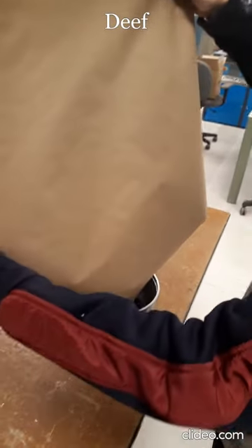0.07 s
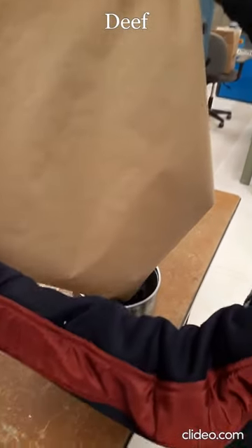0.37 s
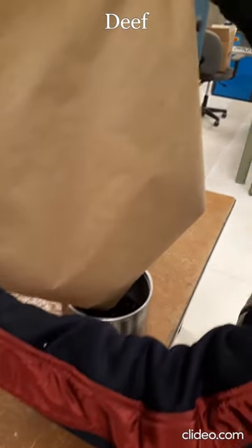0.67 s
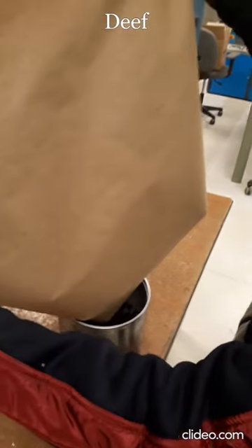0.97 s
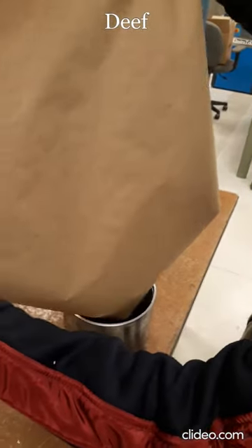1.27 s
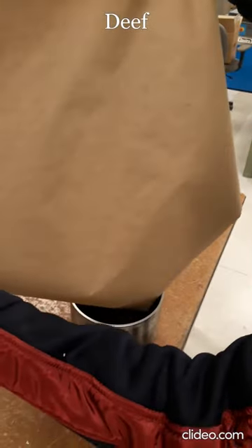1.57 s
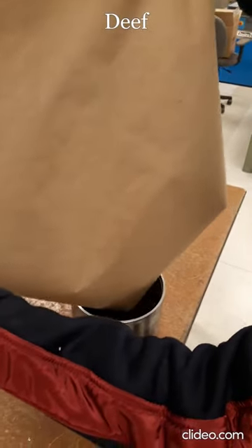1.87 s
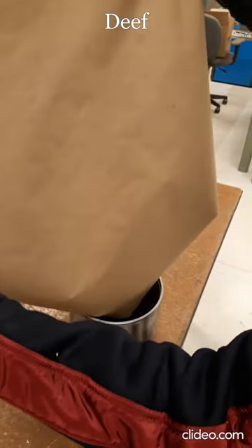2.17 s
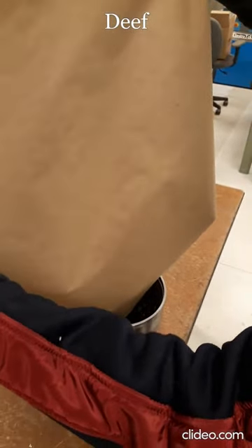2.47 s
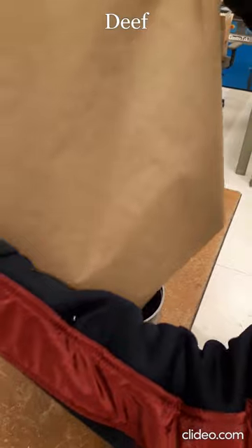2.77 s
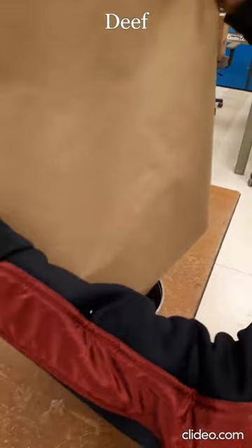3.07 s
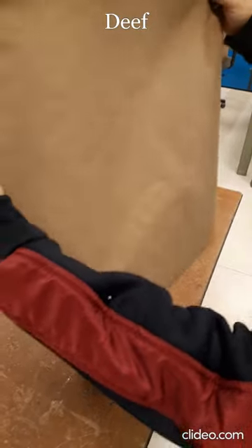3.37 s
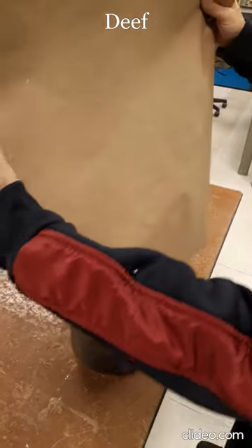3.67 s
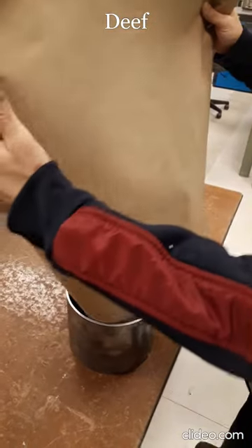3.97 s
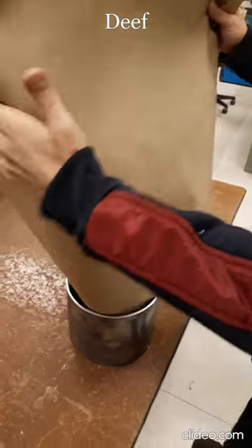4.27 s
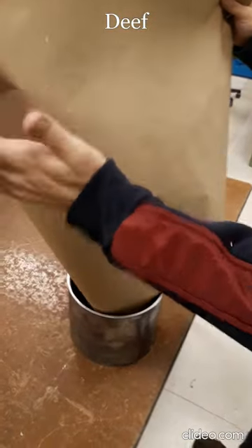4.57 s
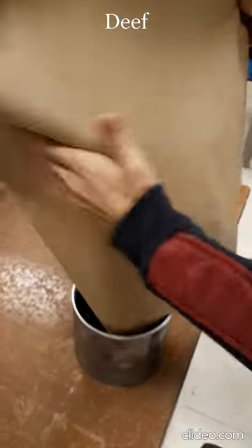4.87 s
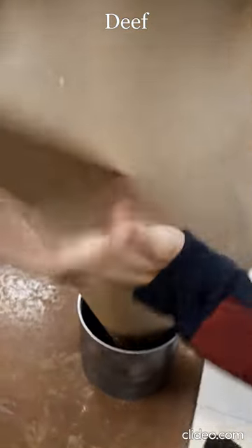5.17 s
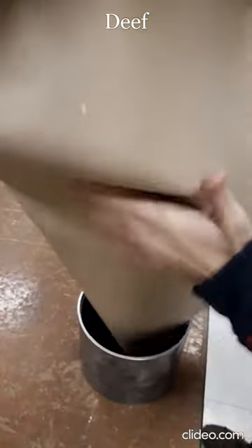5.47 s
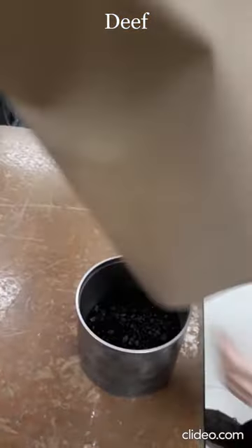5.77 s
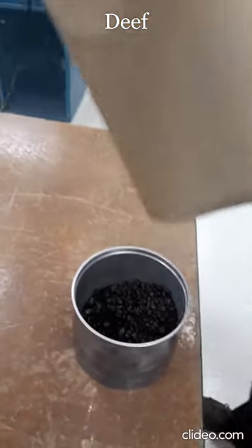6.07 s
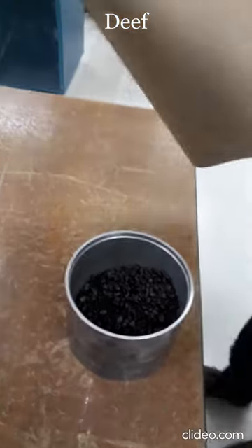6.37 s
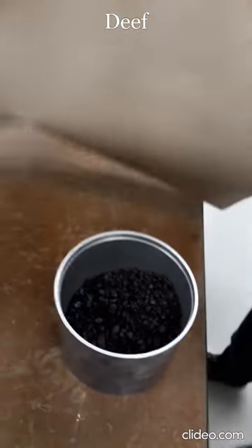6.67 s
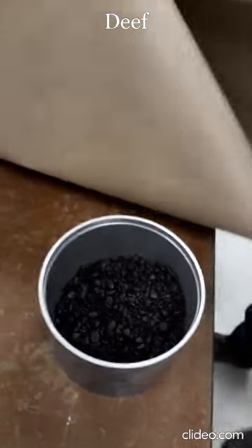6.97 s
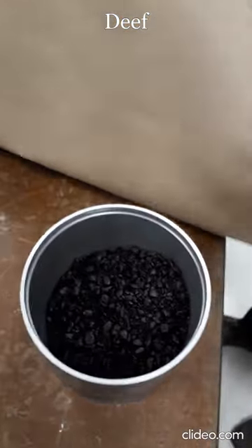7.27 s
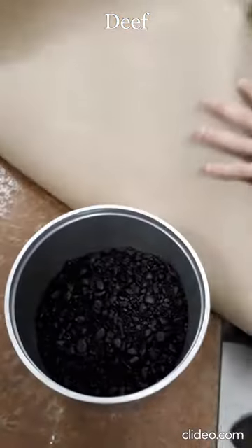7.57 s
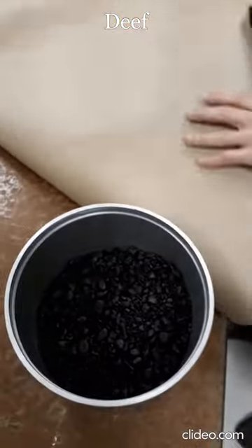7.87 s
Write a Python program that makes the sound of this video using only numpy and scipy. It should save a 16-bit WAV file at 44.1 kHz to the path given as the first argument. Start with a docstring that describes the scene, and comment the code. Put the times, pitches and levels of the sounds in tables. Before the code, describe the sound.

Loose gravelly mix hisses down paper and patters into a metal pot, then the big sheet is crinkled, slapped and smoothed flat.

```python
"""Asphalt mix poured from kraft paper.

Loose mix hisses down a big paper sheet and patters into a metal pot on a lab bench, ringing it.
The emptied sheet flexes and buckles, is shaken and slapped to free the last crumbs, then lands on
the bench and is smoothed by hand. Ventilation hums in the small hard room. Close and nearly mono."""
import sys
import numpy as np
from scipy import signal
from scipy.fft import rfft, irfft
from scipy.io import wavfile
from scipy.ndimage import uniform_filter1d, map_coordinates

SR = 44100
rng = np.random.default_rng(int(sys.argv[2]) if len(sys.argv) > 2 else 0)


def to_wav(s):
    """Save 16-bit WAV."""
    ch = np.atleast_2d(s).T  # columns
    pcm = np.round(np.clip(ch, -1, 1) * 32767)  # PCM
    wavfile.write(sys.argv[1], SR, pcm.astype(np.int16))


N = 357651
TIME_S = np.arange(N) / SR

# Spectra. Each row: frequency in Hz, relative level in dB.
VENT_SPECTRUM = [(25, -33.5), (60, -3), (110, -2), (170, 10), (260, -7), (500, -24.5), (900, -7.5),
                 (2000, -7), (3000, -19.5), (6000, -22), (10000, -47), (16000, -29.5)]
HEAP_SPECTRUM = [(40, -69), (110, -35.5), (160, -17), (330, -13), (480, -18.5), (580, -14), (900, 0),
                 (1300, -2.5), (2500, -5.5), (3150, -10), (3900, -6.5), (7000, -15), (10000, -28),
                 (16000, -31)]  # stones landing on the heap
GRIT_SPECTRUM = [(1500, -64.5), (3200, -18), (3850, -0.5), (4600, -2.5), (5300, 2), (6400, 0.5), (8000, -3),
                 (9200, -9.5), (10200, -22.5), (16000, -23.5)]  # grit on paper
SAND_SPECTRUM = [(8000, -52.5), (10500, -16), (12000, -6.5), (13500, -2), (15800, -5)]  # fine sand on paper
CLICK_SPECTRUM = [(1200, 7), (2500, -5), (4200, 11), (6500, 2), (9000, -20), (16000, -23)]  # stone on stone
FLAP_SPECTRUM = [(30, -55), (70, -9), (130, -3.5), (250, 4.5), (410, 5), (560, -2.5), (900, -57.5)]  # slow waves in the sheet
FLEX_SPECTRUM = [(250, -24.5), (560, -6), (660, 7), (760, 7), (950, 7.5), (1300, 1), (1700, 2), (2400, -14),
                 (3200, -26.5), (6000, -63)]  # paper bending
RUB_SPECTRUM = [(1200, -19.5), (2300, 10.5), (3100, 3), (4000, 4), (4700, -0.5), (5400, 1), (7000, -7),
                (8300, -11), (10000, -46), (16000, -35)]  # paper rubbing
FIZZ_SPECTRUM = [(6000, -31), (9000, -3), (10300, -6), (12500, -0.5), (15000, 4.5), (16000, -5.5)]  # paper fibres
SNAP_SPECTRUM = [(40, -29), (130, -10), (220, -6), (340, 4), (470, 1.5), (570, -9), (680, -2.5), (900, 5),
                 (1300, -1.5), (1800, 1.5), (2500, -4), (3400, -15.5), (8000, -69)]  # body of a crease
CRACK_SPECTRUM = [(1200, -60), (2600, 10.5), (3300, 6), (4100, 12.5), (5400, 11.5), (7000, 5.5),
                  (8500, -0.5), (10000, -17.5), (16000, -8)]  # edge of a crease
THUMP_SPECTRUM = [(30, -25), (80, -12), (170, -3.5), (340, 1.5), (450, -7.5), (600, -15), (1200, -57)]  # palm on the sheet

# Tones. Each row: frequency in Hz, level in dB.
HUM_LINES = [(118.4, -61), (157, -58.5), (263.8, -68)]
SQUEAK_PARTIALS = [(3585, 0), (4430, 0), (5787, -7), (6245, -6), (7838, -3)]

# Resonances. Each row: frequency in Hz, width in Hz, relative level in dB.
POT_MODES = [(426, 37, -6), (549, 24, -17.5), (945, 91, -5)]
CHIP_MODES = [(3840, 680, -5.5), (5280, 630, 2)]  # sliding chips
PALM_AIR_MODES = [(327, 41, 0)]  # air trapped between palm and paper

# Stone stream. Each row: time in seconds, flow in dB, relative hiss in steps of 1.55 dB, sand in dB.
POUR_CURVES = [(0, -19.5, -1.5, -33), (0.24, -16.5, -4.5, -29), (0.48, -21.5, -1.5, -34.5),
               (0.7, -17, -1.5, -26), (1.0, -16, -1, -22.5), (1.3, -16.5, -3.5, -27.5),
               (1.48, -19.0, -1.5, -31), (1.75, -16.0, -1, -22), (2.03, -15.5, 0.5, -21.5),
               (2.28, -15, -1.5, -23.5), (2.42, -20.5, -3, -37.5), (2.49, -26, -12, -56),
               (2.55, -43, -3.5, -66)]
# Rim squeaks. Each row: start in seconds, length in seconds, level in dB.
RIM_SQUEAKS = [(-.015, .05, -19.5), (.372, .045, -19.5)]
# Stragglers. Each row: start in seconds, level in dB.
LAST_STONES = [(2.5, -26.5), (2.516, -29), (2.522, -31), (2.544, -35), (2.565, -27), (2.596, -31.5),
               (2.626, -35.5)]
# Slow sheet handling. Each row: time in seconds, flex in dB, rub in dB.
HANDLING_CURVES = [(2.5, -73, -42), (2.75, -40, -55), (3.27, -42.5, -45.5), (3.46, -38, -60),
                   (3.67, -56, -43.5), (3.95, -43, -44), (4.4, -103, -97), (4.92, -33.5, -48),
                   (5.17, -70, -55), (5.66, -45.5, -54), (5.9, -66.5, -68), (6.56, -53.5, -60.5),
                   (6.66, -46, -39.5), (7.0, -35, -36.5), (7.25, -49.5, -51), (7.44, -37.5, -70),
                   (7.56, -41, -35), (8.11, -35.5, -40.5)]
# Bends, shakes, landing. Each row: peak time in seconds, rise in seconds, flex in dB, rub in dB.
SHEET_BENDS = [(2.8, 0.044, -32.5, -41), (2.974, 0.079, -30, -68), (3.175, 0.057, -31, -63),
               (3.365, 0.069, -27.5, -35.5), (3.42, 0.14, -26, -40), (3.505, 0.1, -24.5, -44),
               (3.555, 0.028, -24, -52), (3.62, 0.024, -31, -45), (3.746, 0.05, -23, -38),
               (3.862, 0.015, -25.5, -26), (3.912, 0.11, -21, -30), (3.942, .04, -39, -39),
               (4.135, 0.16, -26.5, -41), (4.277, 0.064, -20, -25.5), (4.455, 0.053, -22, -34),
               (4.513, 0.083, -20, -27.5), (6.742, 0.024, -24, -21), (6.804, 0.04, -15.5, -14),
               (7.6, 0.2, -30, -30), (7.67, 0.086, -28, -36), (7.728, 0.064, -28, -33.5),
               (7.93, 0.02, -35, -39)]
# Loud creases. Each row: start in seconds, level in dB, panel pitch in Hz, crack and fizz in relative dB.
LOUD_CREASES = [(2.658, -32.5, 1290, -19, -35), (2.706, -37, 900, -10, -37), (2.784, -31, 2090, -12, -32),
                (2.945, -31, 850, -26, -39), (3.056, -25.5, 855, -10.5, -35),
                (3.287, -36.5, 1860, -10, -11), (3.323, -31.5, 950, -20, -31),
                (3.352, -25.5, 1900, -18, -42), (3.399, -28, 1200, -16, -34), (3.442, -36, 2500, -13, -34),
                (3.511, -34, 790, -5, -30.5), (3.532, -28, 2700, -13, -32), (3.549, -20.5, 1690, -20, -31),
                (3.564, -31, 950, -22, -25), (3.571, -39, 780, 5, -15), (3.607, -25, 1700, -9.5, -51),
                (3.624, -31, 720, -8, -12), (3.661, -50, 720, 9, -17), (3.696, -28, 950, -30, -17),
                (3.82, -24, 1500, -10.5, -28), (3.83, -19, 880, -27, -34), (3.853, -21, 2300, 0, -3),
                (4.041, -27.5, 1190, -13, -23), (4.057, -27, 2670, 1, -3.5), (4.088, -25, 1680, -10.5, -36),
                (4.125, -28.5, 990, -8, -36.5), (4.202, -25, 900, -22, -37), (4.221, -24.5, 2600, -2.5, -8),
                (4.237, -22.5, 2700, -11, -16), (4.262, -25, 2300, -1, -4), (4.28, -24.5, 2480, -17, -36),
                (4.295, -22, 1900, 2, -4), (4.301, -26.5, 1050, 1, -14), (4.352, -26.5, 2700, -6.5, -20.5),
                (4.415, -32, 945, -8, -10), (4.434, -21, 1500, 3.5, -1.5), (4.511, -21, 2200, -0.5, -49.5),
                (4.681, -27, 1500, -11, -38), (4.764, -44, 820, -3, -1), (4.825, -21, 1910, 2, -17),
                (4.956, -36, 960, -9, -31), (4.979, -34, 970, -5.5, -14.5), (5.066, -22, 1700, -7, -38),
                (5.215, -23, 1980, 0, -3), (5.289, -40, 910, -2, -19), (5.35, -45, 1700, -1, -12),
                (5.407, -28, 1900, -10, -40), (5.444, -28.5, 1490, -12.5, -40),
                (5.643, -37, 1340, -12.5, -39), (5.828, -29, 1210, -12.5, -54.5),
                (6.18, -45, 1420, -12, -29), (6.387, -31, 1600, -9.5, -28), (6.418, -40, 880, -22, -40),
                (6.573, -40.5, 890, -16, -27), (6.661, -32.5, 1630, -20, -16), (6.726, -27.5, 2500, -2, -5),
                (6.737, -25, 2610, -2, -25), (6.762, -18, 2350, -22, -32), (6.776, -18, 1800, -1.5, -22),
                (6.786, -17, 1910, -8, -34.5), (6.808, -14.5, 1900, -14, -46), (6.832, -22, 1070, -5, -28),
                (6.874, -20.5, 920, -11, -37), (6.897, -36, 800, -9, -2), (6.945, -27, 870, -9, -20),
                (7.028, -40, 860, -16, -8), (7.081, -34.5, 990, -9, -16.5), (7.184, -29.5, 2250, -10, -27),
                (7.311, -36, 970, -17, -46), (7.362, -45, 1560, -19, -35), (7.432, -39, 880, -20, -24),
                (7.519, -27, 1400, -1.5, -6), (7.595, -41, 1500, 0, -22), (7.613, -18, 1560, -4, -19.5),
                (7.654, -21, 2820, -6, -24), (7.7, -35, 940, -9, -38), (7.92, -29, 1570, -10, -38),
                (7.946, -29, 980, -20, -34), (8.011, -25, 1570, -11.5, -39), (8.058, -32, 1110, -8, -20)]
# Crease speed. Each row: fizz in relative dB, swell in ms.
SWELL_MS_BY_FIZZ = [(-50, 4.5), (-32, 2.5), (-18, 1.4)]
# Small buckles move too little paper to radiate bass. Each row: level in dB, low cut in Hz.
LOW_CUT_HZ_BY_LEVEL = [(-32, 430), (-24, 300), (-17, 110)]
# Hand or sleeve slides. Each row: start in seconds, length in seconds, level in dB.
HAND_SLIDES = [(3.25, 0.99, -65), (4.194, 0.15, -71), (7.43, 0.34, -48.5)]
# Slaps. Each row: start in seconds, level in dB, panel pitch in Hz, crack and fizz in relative dB,
# swell in ms, flutter and thump in dB, rebound delay in seconds, its level, crack, fizz in relative dB.
HAND_SLAPS = [(4.612, -19.5, 1200, -4, -7.5, 2.9, -16.5, -21.5, 0.062, -8, -5, -33),
              (4.814, -19, 1810, -2, -16, 4.5, -20, -26.5, 0.0375, -5.5, 1, -7),
              (5.02, -15, 2280, 0.5, -22, 4.5, -20.5, -26, 0.069, -11.5, -1.5, -29.5),
              (5.205, -22, 1030, -6, -15, 6, -25, -30, 0.051, -4, -5, -47),
              (5.384, -19.5, 2000, -2, -15, 6.5, -23.5, -21.5, 0.054, -4, -7.5, -37)]
# Room decay. Each row: frequency in Hz, T60 in seconds.
ROOM_T60_S = [(150, 0.39), (500, 0.47), (1500, 0.099), (4000, 0.07), (14000, 0.31)]


def undb(db):
    return 10 ** (np.asarray(db) / 20)


def unit_rms(x):
    return x / np.sqrt(np.mean(x ** 2))


def curves(table):
    """Table columns interpolated over time."""
    times_s, *columns = np.transpose(table)
    return [np.interp(TIME_S, times_s, column) for column in columns]


def on_log_axis(points, hz):
    points_hz, values = np.transpose(points)
    return np.interp(np.log(np.maximum(hz, 1)), np.log(points_hz), values)


def colour(x, spectrum, modes=(), size=4096):
    """Minimum-phase filter of unit power: broad spectrum plus resonances."""
    hz = np.fft.rfftfreq(size, 1 / SR)
    power = undb(on_log_axis(spectrum, hz)) ** 2
    for mode_hz, width_hz, db in modes:
        power = power + undb(db) ** 2 / (1 + (2 * (hz - mode_hz) / width_hz) ** 2) ** 2
    cepstrum = irfft(np.log(power / power.mean()) / 2)
    cepstrum[1:size // 2] *= 2
    cepstrum[size // 2 + 1:] = 0
    return signal.fftconvolve(x, irfft(np.exp(rfft(cepstrum))))[:N]


def wander(rate_hz):
    """Random drift, spread near 1."""
    knots = rng.standard_normal(N)
    return np.interp(TIME_S * rate_hz, np.arange(N), knots) * np.sqrt(3 / 2)


def grains(per_s, spread_db):
    """Random tiny impacts, mostly small; rms 1."""
    hit = rng.random(N) < per_s / SR
    size = undb(spread_db * np.minimum(rng.exponential(size=N), 3.5))
    return unit_rms(hit * size * rng.choice([-1, 1], N))


def arch(start_s, length_s):
    return np.abs(np.sin(np.pi * np.clip((TIME_S - start_s) / length_s, 0, 1)))


def add(track, start_s, sound):
    start = int(start_s * SR)
    track[start:start + len(sound)] += sound[:N - start]


def ventilation():
    """Soft air noise with wavering fan and mains hum."""
    air = colour(rng.standard_normal(N), VENT_SPECTRUM) * undb(-56.5 + .8 * wander(1.7))
    hum = sum(undb(db + 2 * wander(3.5)) * np.sin(2 * np.pi * hz * TIME_S + .5 * wander(3.2))
              for hz, db in HUM_LINES)
    return air + np.sqrt(2) * hum


def pour(stop_s=0.12):
    """Sticky stones tumble into the pot in clumps; grit and sand hiss down the paper."""
    flow_db, hiss_steps, sand_db = curves(POUR_CURVES)
    running = np.clip(1 - (TIME_S - POUR_CURVES[-1][0]) / stop_s, 0, 1)
    clumps_db = 0.5 * wander(44.5) + 0.36 * wander(11.47)
    patter = colour(grains(8000, 1.5), HEAP_SPECTRUM)
    heap = (patter + pot_ring()) * undb(flow_db + clumps_db + 0.73)
    grit_db = flow_db + 1.55 * hiss_steps + .5 * clumps_db - 2.0
    grit = colour(grains(20000, 1.5), GRIT_SPECTRUM, CHIP_MODES) * undb(grit_db)
    sand = colour(grains(20000, 1.5), SAND_SPECTRUM) * undb(sand_db + .6 * wander(60))
    return (heap + grit + sand) * running


def pot_ring(level_db=-13.5, detune=.022, wander_db=2.8, wander_hz=7):
    """Patter rings the pot; the piling mix damps and detunes each mode."""
    ring = 0
    for hz, width_hz, db in POT_MODES:
        resonator = signal.iirpeak(hz, hz / width_hz, fs=SR)
        band = signal.butter(2, [hz / 2, hz * 2], "band", fs=SR, output="sos")
        steady = signal.sosfilt(band, unit_rms(signal.lfilter(*resonator, grains(6000, 1.0))))
        read_at = np.cumsum(1 + detune * wander(wander_hz))
        drifting = map_coordinates(steady, [read_at], order=1, mode="mirror")
        ring = ring + drifting * undb(db + wander_db * wander(wander_hz))
    return undb(level_db) * unit_rms(ring)


def pebbles(per_s=45, level_db=-20.5, scatter_db=2.4, centre_hz=3000, spread_oct=.85, decay_s=0.004):
    """Coarser stones knock together, each at its own pitch."""
    t, track = TIME_S[:SR // 50], np.zeros(N)
    end_s = POUR_CURVES[-3][0]
    times_s = np.cumsum(rng.exponential(size=140)) / per_s
    for start_s, (loud, pitch) in zip(times_s, rng.standard_normal((len(times_s), 2)).clip(-1.7, 1.7)):
        hz = centre_hz * 2 ** (spread_oct * pitch)
        knock = rng.standard_normal(len(t)) * np.exp(-t / decay_s)
        if start_s < end_s:
            pitched = colour(knock, HEAP_SPECTRUM, modes=[(hz, 0.28 * hz, 18)])
            add(track, start_s, undb(level_db + scatter_db * loud) * pitched)
    return track


def squeaks(waver=0.0023):
    """Stick-slip of a stone on the rim: rough, wavering partials."""
    gate = sum(undb(db) * arch(start_s, length_s) for start_s, length_s, db in RIM_SQUEAKS)
    tones = 0
    for hz, db in SQUEAK_PARTIALS:
        gain = undb(db + 2.2 * wander(180))
        cycles = np.cumsum(hz * (1 + waver * wander(380))) / SR
        tones = tones + gain * np.sin(2 * np.pi * cycles)
    return gate * unit_rms(tones)


def last_stones(decay_s=0.0043, heap_db=-5):
    """Stragglers click on the heap and lightly ring the pot."""
    t, hits = TIME_S[:SR // 40], np.zeros(N)
    for start_s, db in LAST_STONES:
        add(hits, start_s, undb(db) * rng.standard_normal(len(t)) * np.exp(-t / decay_s))
    return colour(hits, CLICK_SPECTRUM) + undb(heap_db) * colour(hits, HEAP_SPECTRUM, POT_MODES)


def bend_power(peak_s, rise_s, db, fall_db_per_s):
    """One movement: up 20 dB over the rise time, then a steady fall."""
    drop_db = np.maximum(20 * (peak_s - TIME_S) / rise_s, fall_db_per_s * (TIME_S - peak_s))
    return undb(db - drop_db.clip(0, 120)) ** 2


def sheet_motion(flutter_lag_s=0.0085, flutter_rub_db=-5):
    """Flex and rub in dB from handling, bends and the flutter after each slap."""
    flex_power, rub_power = undb(curves(HANDLING_CURVES)) ** 2
    flutters = [(start_s + flutter_lag_s, flutter_lag_s / 2, db, db + flutter_rub_db)
                for start_s, _, _, _, _, _, db, *_ in HAND_SLAPS]
    for peak_s, rise_s, flex_db, rub_db in SHEET_BENDS + flutters:
        flex_power += bend_power(peak_s, rise_s, flex_db, fall_db_per_s=158)
        rub_power += bend_power(peak_s, rise_s, rub_db, fall_db_per_s=197)
    return 10 * np.log10(flex_power), 10 * np.log10(rub_power)


def sheet(flex_db, rub_db, fade_in_s=0.082):
    """Paper flaps and crinkles as it bends, hisses against hands and bench."""
    moving = np.clip((TIME_S - HANDLING_CURVES[0][0]) / fade_in_s, 0, 1)
    flutter_db = 2.0 * wander(70)
    crinkle = 0.47 * grains(900, 6.6) + 0.89 * rng.standard_normal(N)
    fibres = 0.23 * grains(2200, 43.0) + 0.57 * rng.standard_normal(N)
    flap = colour(rng.standard_normal(N), FLAP_SPECTRUM) * undb(0.67 * flex_db - 17.5 + 2 * wander(30))
    flex = colour(crinkle, FLEX_SPECTRUM) * undb(flex_db + flutter_db - 3.0)
    rub = colour(fibres, RUB_SPECTRUM) * undb(rub_db + 1.2 * flutter_db + 0.89 * wander(81) + 1.0)
    fizz = colour(fibres, FIZZ_SPECTRUM) * undb(0.68 * rub_db + flutter_db - 29.5)
    return (flap + flex + rub + fizz) * moving


def crease(start_s, db, panel_hz, crack_db, fizz_db):
    """One buckle row: brighter fizz, faster swell."""
    swell_ms = np.interp(fizz_db, *np.transpose(SWELL_MS_BY_FIZZ))
    return start_s, db, panel_hz, crack_db, fizz_db, swell_ms


def creases(flex_db, per_s=26, scatter_db=6.5, centre_hz=1110, count=240):
    """Buckle rows: the loud creases, plus small random ones that grow with flexing."""
    rows = [crease(*row) for row in LOUD_CREASES]
    times_s = HANDLING_CURVES[0][0] + np.cumsum(rng.exponential(size=count)) / per_s
    for start_s, (soft, octaves, bright) in zip(times_s, rng.standard_normal((count, 3)).clip(-2, 2)):
        if start_s < TIME_S[-1]:
            typical_db = min(flex_db[int(start_s * SR)] - 10, -26)
            rows.append(crease(start_s, typical_db - scatter_db * soft, centre_hz * 2 ** octaves,
                               crack_db=-16 + 4 * bright, fizz_db=-27 + 8 * bright))
    return rows


def click_burst(clicks, start_s, swell_ms, decay_s, pop, span_s=0.007):
    """Fibre clicks swell, pop and decay; energy equals span_s at rms 1."""
    t = TIME_S[:SR // 25]
    peak_s = swell_ms / 1000
    envelope = np.minimum(t / peak_s, 1) * np.exp(-np.maximum(t - peak_s, 0) / decay_s)
    burst = envelope * np.take(clicks, int(start_s * SR) + np.arange(len(t)), mode="wrap")
    burst[int(peak_s * SR)] = pop * np.linalg.norm(burst)
    return burst * np.sqrt(span_s * SR) / np.linalg.norm(burst)


def buckles(rows, base_decays_s=(0.0132, 0.0066, 0.0027)):
    """Each buckle is an avalanche of fibre clicks ringing its own panel of paper."""
    clicks = .7 * grains(9000, 3.8) + .7 * rng.standard_normal(N)
    snaps, cracks, fizzes = np.zeros((3, N))
    for start_s, db, panel_hz, crack_db, fizz_db, swell_ms in rows:
        stretch = (swell_ms / 3) ** .4  # quick buckles die quickly
        pop = max(undb(2 + 2.1 * fizz_db), undb(crack_db - 7))  # bright ones snap in one jump
        snap, crack, fizz = (click_burst(clicks, start_s, swell_ms, base_s * stretch, pop)
                             for base_s in base_decays_s)
        edge_hz = min(8500 * undb(.5 * crack_db), SR / 3)  # weak cracks are duller
        low_cut_hz = np.interp(db, *np.transpose(LOW_CUT_HZ_BY_LEVEL))
        snap = signal.lfilter(*signal.butter(2, low_cut_hz, "high", fs=SR), snap)
        snap = colour(snap, SNAP_SPECTRUM, modes=[(panel_hz, .45 * panel_hz, 4)])
        crack = signal.lfilter(*signal.butter(2, edge_hz, fs=SR), crack)
        add(snaps, start_s, undb(db) * snap)
        add(cracks, start_s, undb(db + crack_db) * crack)
        add(fizzes, start_s, undb(db + fizz_db) * fizz)
    return (undb(3.0) * snaps + undb(2.0) * colour(cracks, CRACK_SPECTRUM)
            + undb(-4.5) * colour(fizzes, FIZZ_SPECTRUM))


def slides(crinkle_db=2):
    """Skin or cloth hisses over the paper, catching on tiny crinkles."""
    gate = sum(undb(db) * np.sqrt(arch(start_s, length_s)) for start_s, length_s, db in HAND_SLIDES)
    hiss = undb(2 * wander(40)) * colour(grains(6000, 3), FIZZ_SPECTRUM)
    crinkle = undb(crinkle_db) * colour(grains(300, 4.3), CRACK_SPECTRUM)
    return gate * (hiss + crinkle)


def slaps():
    """Buckle rows: each slap, then a second snap as the sheet swings back."""
    rows = []
    for start_s, db, panel_hz, crack_db, fizz_db, swell_ms, _, _, *rebound in HAND_SLAPS:
        delay_s, rebound_db, *brightness_db = rebound
        rows.append((start_s, db, panel_hz, crack_db, fizz_db, swell_ms))
        rows.append(crease(start_s + delay_s, db + rebound_db, panel_hz, *brightness_db))
    return rows


def palm_thumps(lag_s=0.00707, decay_s=0.014, shudder_db=-4, span_s=0.0085):
    """The flat hand shoves the whole sheet: low thump, brief shudder."""
    t, shoves = TIME_S[:SR // 8], np.zeros(N)
    for start_s, *_, thump_db, _, _, _, _ in HAND_SLAPS:
        shudder = rng.standard_normal(len(t)) * np.exp(-t / decay_s)
        shove = (t == 0) + undb(shudder_db) * shudder / np.linalg.norm(shudder)
        add(shoves, start_s + lag_s, undb(thump_db) * np.sqrt(span_s * SR) * shove)
    return colour(shoves, THUMP_SPECTRUM, PALM_AIR_MODES)


def smoothing(start_s=7.1, rise_s=0.22, level_db=-43):
    """A hand presses the sheet flat: low rub on the bench."""
    pressing = np.clip((TIME_S - start_s) / rise_s, 0, 1)
    return pressing * undb(level_db + 1.5 * wander(12)) * colour(rng.standard_normal(N), THUMP_SPECTRUM)


def room(x, wet_db, gap_s=0.009):
    """Direct sound plus diffuse echoes; the low treble dies first."""
    t = TIME_S[:SR * 3 // 4]
    hz, frame_s, cells = signal.stft(rng.standard_normal(len(t)), SR, nperseg=256)
    fade = np.exp(-np.log(1000) * frame_s / on_log_axis(ROOM_T60_S, hz)[:, None])
    tail = signal.istft(cells * fade, SR)[1][:len(t)] * (t > gap_s)
    return x + undb(wet_db) * signal.fftconvolve(x, tail / np.linalg.norm(tail))[:N]


def scene(spread_db=-5, spread_above_hz=4600):
    """Pot close and centred; the sheet's treble echoes spread sideways."""
    pot = room(pour() + pebbles() + squeaks() + last_stones(), wet_db=-16.5)
    flex_db, rub_db = sheet_motion()
    paper = undb(0.5) * sheet(flex_db, rub_db) + buckles(slaps() + creases(flex_db))
    paper += palm_thumps() + smoothing() + slides()
    centre = pot + room(paper, wet_db=-15.5) + ventilation()
    echoes = room(paper, wet_db=spread_db) - paper
    side = signal.sosfilt(signal.butter(6, spread_above_hz, "high", fs=SR, output="sos"), echoes)
    return np.array([centre + side, centre - side])


def thin_bass(x, below_hz=115, threshold_db=-19, knee_db=4, window_s=0.3):
    """A low cut fades in while the left channel stays loud."""
    power = np.abs(uniform_filter1d(x[0] ** 2, int(window_s * SR)))
    level_db = 10 * np.log10(power + 1e-12)
    share = np.clip((level_db - threshold_db) / knee_db, 0, 1)
    thinned = signal.sosfiltfilt(signal.butter(3, below_hz, "high", fs=SR, output="sos"), x)
    return x + share * (thinned - x)


def record(dry, top_hz=15950):
    """Soft clip, bass thinned while the sound stays loud, steep low-pass."""
    rounded = dry / (1 + dry ** 6) ** (1 / 6)
    low_pass = signal.ellip(10, .2, 70, top_hz, fs=SR, output="sos")
    return signal.sosfilt(low_pass, thin_bass(rounded))


dry = scene()
out = record(dry)
to_wav(out)
```